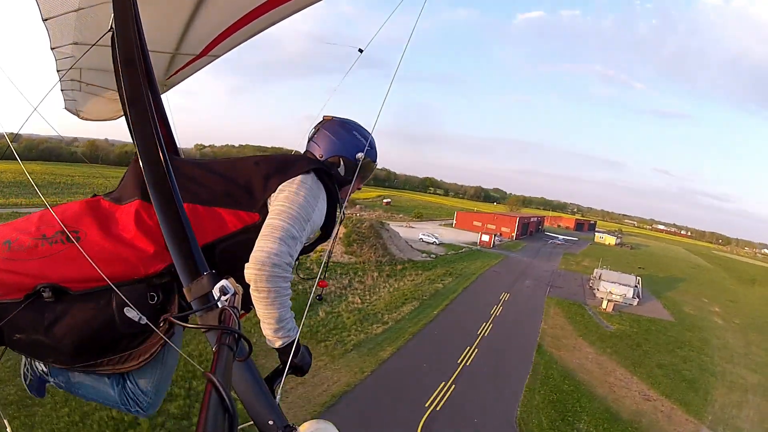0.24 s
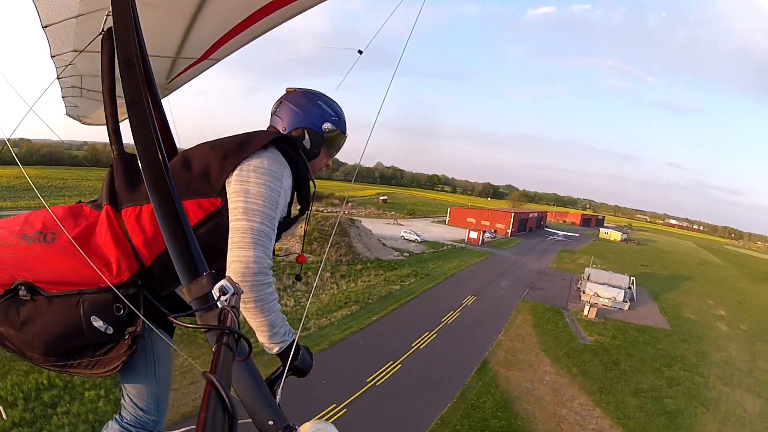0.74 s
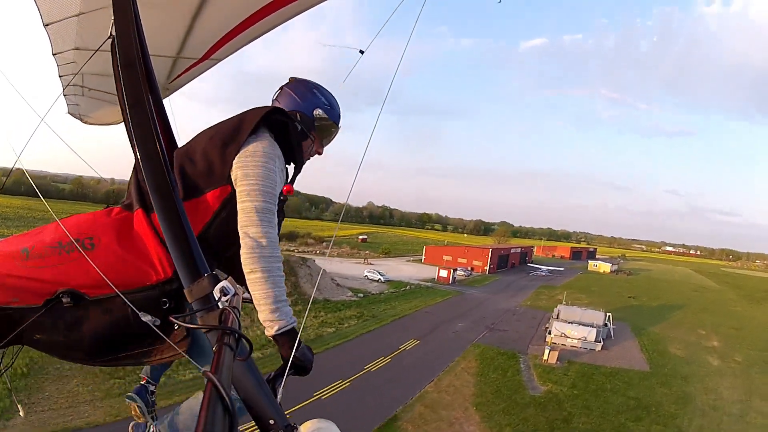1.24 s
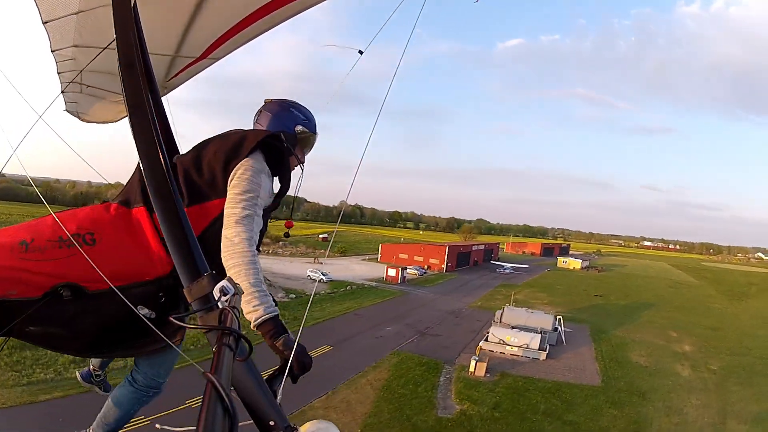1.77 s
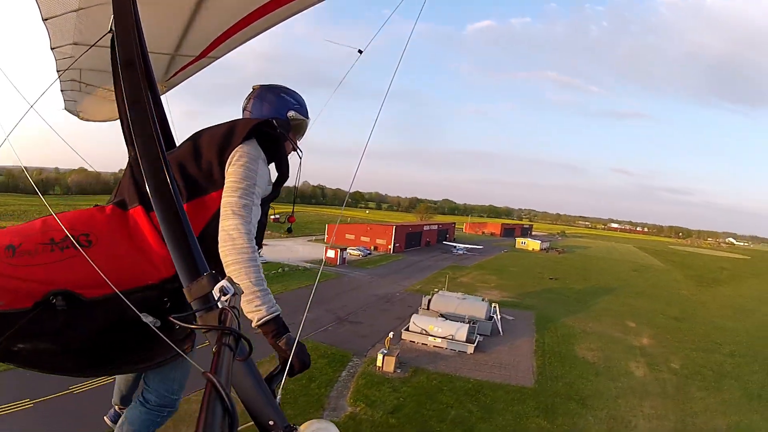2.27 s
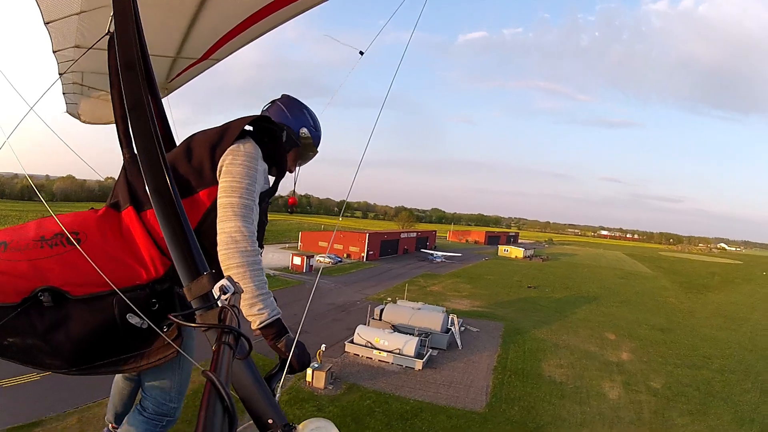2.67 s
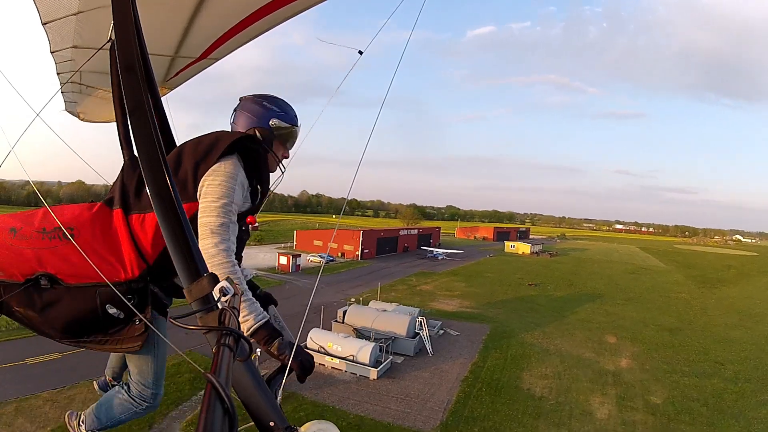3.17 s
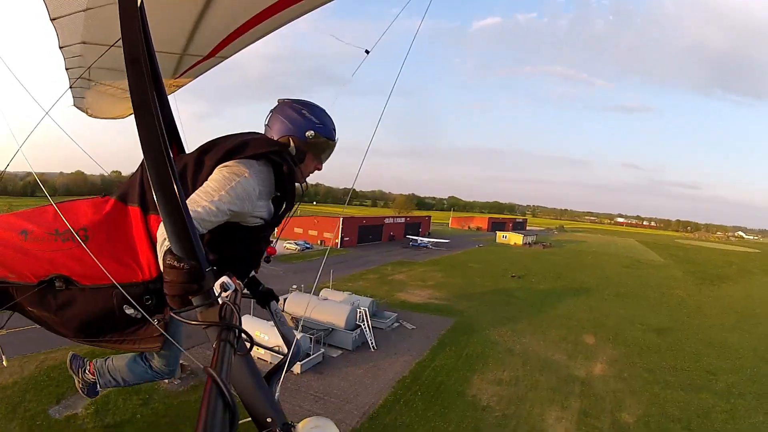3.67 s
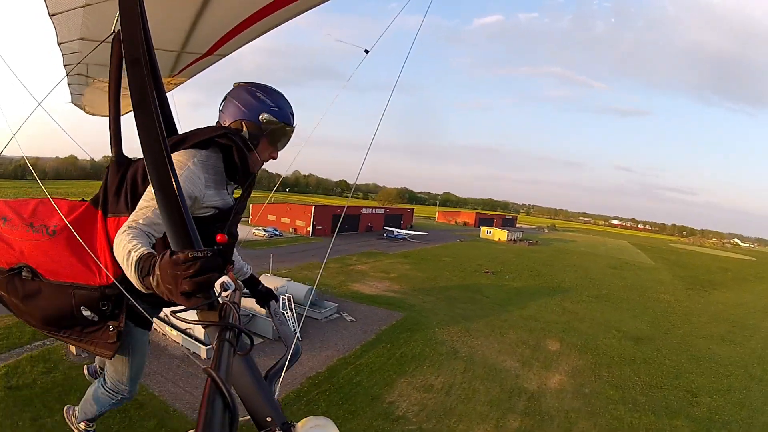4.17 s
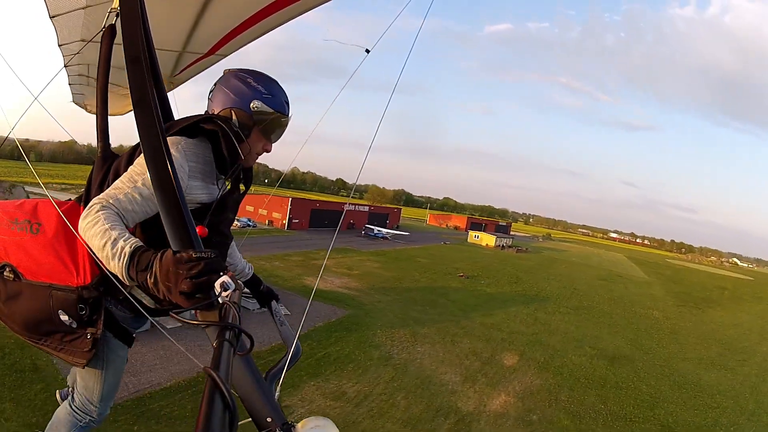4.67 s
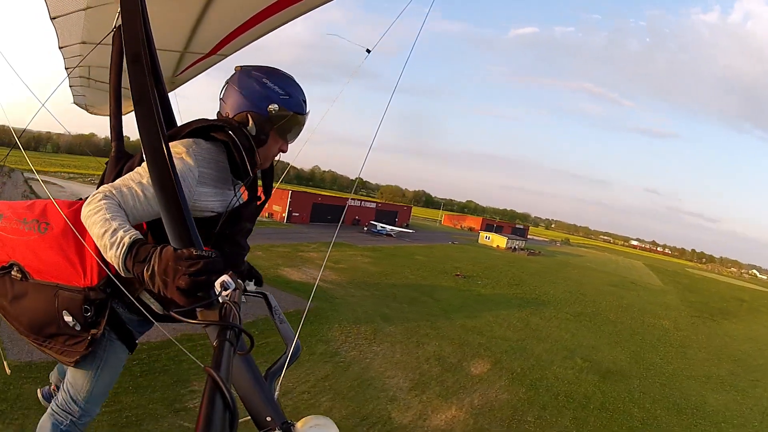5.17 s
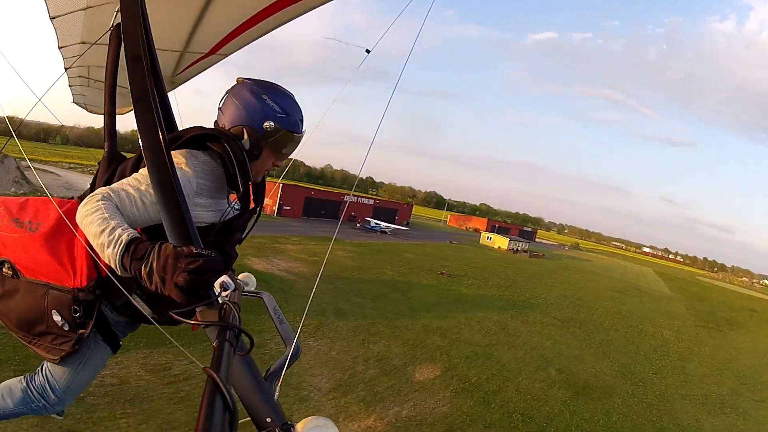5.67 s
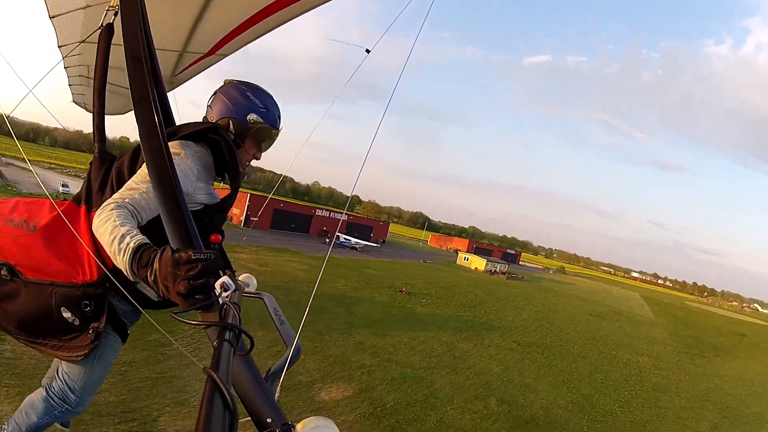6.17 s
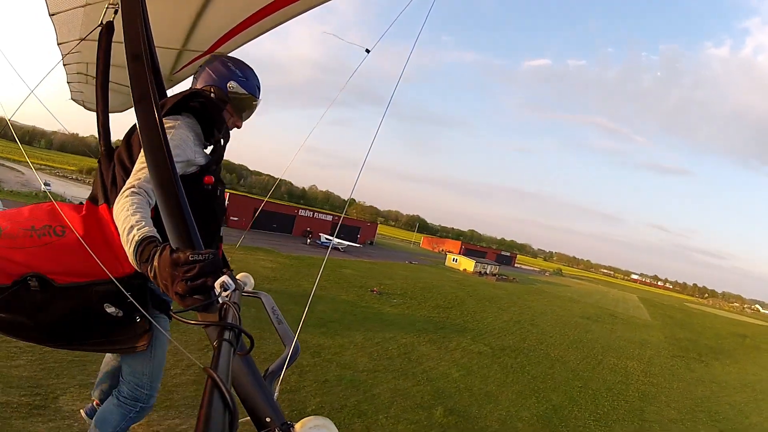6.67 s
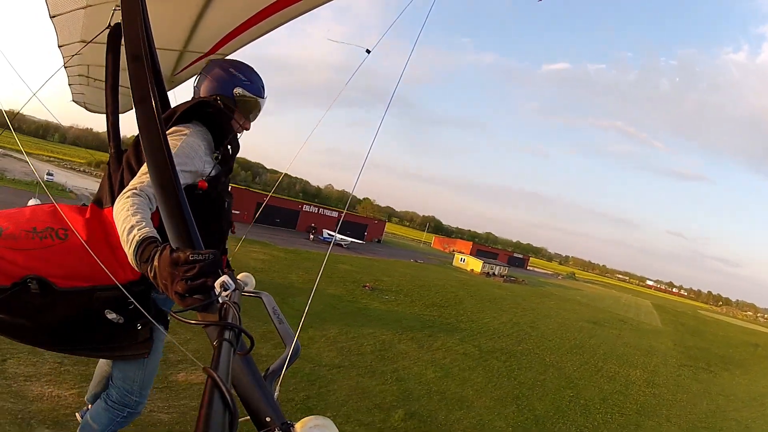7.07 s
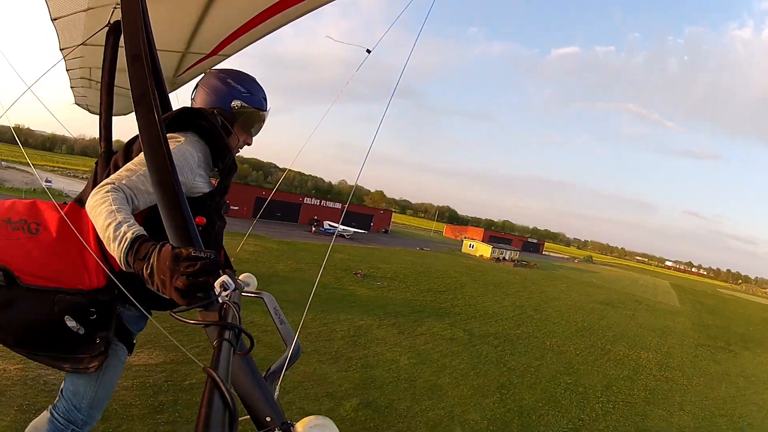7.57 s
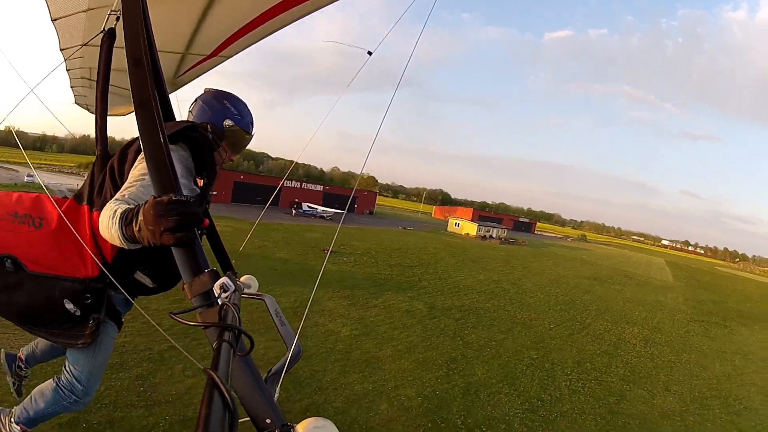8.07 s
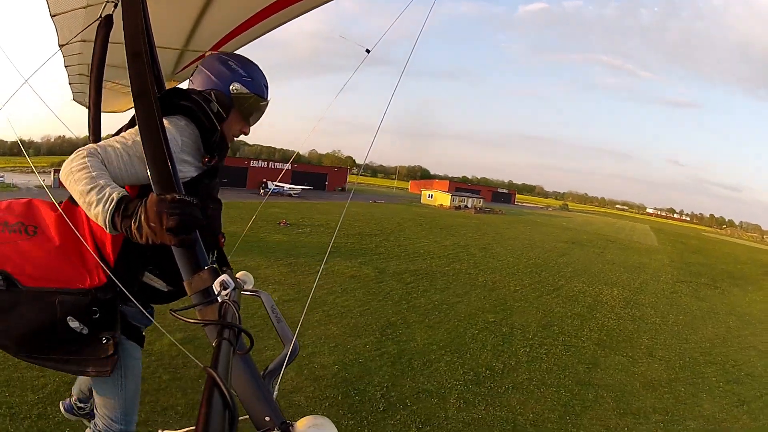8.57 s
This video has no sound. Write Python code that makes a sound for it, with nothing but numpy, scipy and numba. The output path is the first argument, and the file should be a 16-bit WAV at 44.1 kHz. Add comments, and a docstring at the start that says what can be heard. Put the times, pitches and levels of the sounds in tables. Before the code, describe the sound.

Wind blasts a small camera microphone mounted on a hang glider outdoors. It swells within the first 0.3 seconds into loud, fluttering low buffeting, with a mid rumble, bright hiss and a harsh, buzzy digital edge. Small ticks dot the first 1.4 seconds; a deep thump of air hits near 1.7. Firm frame knocks follow from 2.2, with a strong one at 2.7. Around 3.3 to 3.5 a dense clatter of hard, short, ringing clacks breaks out, and another sharp hit comes at 3.7; the wind dips momentarily after strong peaks. Clacks continue near 4.0, 4.8, 5.0, 6.05 and 6.5. The gusts rise and fall, while the hiss steadily thins and the rumble darkens. From 7.7 to 8.5 knocks and rattles gather again, strongest at 8.1 to 8.2, amid faint strap rustles. The wind ends much softer, around 8.8.

```python
"""Wind buffets a small camera's microphone port and hisses past its housing, as shaped noise with shared gusts.
It sinks as the hang glider that carries the camera slows towards a landing.
Rigging knocks travel through the frame and ring the housing, as cracks and decaying modes; straps rustle faintly.
The camera turns its gain down after peaks, clips, and holds each of its 12000 samples a second,
which mirrors the bass as a buzz."""
import sys
import numpy as np
from scipy import signal
from scipy.fft import rfft, irfft, next_fast_len
from scipy.io import wavfile
from scipy.ndimage import map_coordinates
from numba import njit

SR = 44100
rng = np.random.default_rng(int(sys.argv[2]) if len(sys.argv) > 2 else 0)


def bounce(signal):
    """Save signal as a 16-bit WAV file at the path given by the first command-line argument."""
    frames = np.transpose(np.atleast_2d(signal))
    limited = np.clip(frames, -1, 1)
    pcm = np.round(limited * 32767).astype(np.int16)
    wavfile.write(sys.argv[1], SR, pcm)


N = 388962


def amp(db):
    """Gain of a level in dB."""
    return 10 ** (np.asarray(db) / 20)


def unit(x):
    """x scaled to rms 1."""
    return x / np.sqrt(np.mean(x ** 2) + 1e-20)


def curves(rows):
    """One value per sample for each column after the time."""
    times, *columns = np.transpose(rows)
    t = np.arange(N) / SR
    return [np.interp(t, times, column) for column in columns]


def wobble(rate):
    """A smooth random curve with this many knots a second."""
    knots = rng.standard_normal(int(N * rate / SR) + 4)
    return map_coordinates(knots, [np.arange(N) * rate / SR])


def filtered(x, response):
    """x with its spectrum multiplied by a response of frequency."""
    size = next_fast_len(N + 8192)
    spectrum = rfft(x, size) * response(np.fft.rfftfreq(size, 1 / SR))
    return irfft(spectrum, size)[..., :N]


def rush(points, ring=lambda hz: 1):
    """Noise of rms 1, coloured by spectrum points on a log frequency axis and by a ringing response."""
    point_hz, point_db = np.transpose(points)

    def colour(hz):
        """Spectrum gain between the points, times the ringing."""
        return amp(np.interp(np.log(hz + 1), np.log(point_hz + 1), point_db)) * ring(hz)
    return unit(filtered(rng.standard_normal(N), colour))


# Colour of the large eddies on the port: (frequency [Hz], relative level per Hz [dB])
BUFFET_SPECTRUM = [(8.8, -50), (15, -19), (43, -3), (101, 0), (183, -3.5), (350, -12.5), (460, -42),
                   (770, -120)]


def large_eddies(buffet_db, gust):
    """Low buffeting: large eddies press on the port, swayed by the gusts and by a faster flutter."""
    level_db = buffet_db + 1.65 * gust + 1.34 * wobble(25)
    return amp(level_db) * rush(BUFFET_SPECTRUM)


THUMP_S, THUMP_DB, THUMP_HZ = 1.691, 6, 60.4  # centre, level before the envelope, pitch


def thump():
    """One big eddy slaps the port: about a single sine cycle under a bell-shaped envelope."""
    phase = 2 * np.pi * THUMP_HZ * (np.arange(N) / SR - THUMP_S)
    return amp(THUMP_DB) * np.sin(phase) * np.exp(-(phase / 2.7) ** 2)


# Colour of the small eddies in fast air: (frequency [Hz], relative level per Hz [dB])
EDDY_SPECTRUM = [(120, -32.5), (250, 0), (400, 0), (600, -6), (780, -10), (950, -19.5), (1400, -23.5),
                 (2500, -57)]
EDDY_DB, EDDY_LIKE_HISS = 6, 0.54  # level over a blend of buffet and hiss, share of the hiss in it
DARK_HZ, FAST_HISS_DB, SLOW_HISS_DB = 470, -32.5, -51  # the top above DARK_HZ goes as hiss sinks fast to slow


def small_eddies(buffet_db, hiss_db, gust):
    """Mid-range rumble of small eddies, which grows darker as the hiss sinks."""
    blend_db = buffet_db + EDDY_LIKE_HISS * (hiss_db - buffet_db)
    bright = rush(EDDY_SPECTRUM)
    dark = filtered(bright, lambda hz: 1 / (1 + (hz / DARK_HZ) ** 2))
    slow = np.clip((FAST_HISS_DB - hiss_db) / (FAST_HISS_DB - SLOW_HISS_DB), 0, 1)
    level_db = EDDY_DB + blend_db + 1.35 * gust + 1.05 * wobble(30)
    return amp(level_db) * ((1 - slow) * bright + slow * dark)


# Colour of the air past the housing: (frequency [Hz], relative level per Hz [dB])
HISS_SPECTRUM = [(500, -40), (900, -6), (1300, -6.5), (2000, -5.5), (3000, -4.5), (3900, -9), (4800, -15),
                 (5500, -21.5), (6000, -25), (6600, -86)]


def housing_hiss(hiss_db, gust):
    """Air hisses past the housing and sets its first four modes ringing."""
    def ring(hz):
        """Resonant peaks; a mode's width follows from its decay time."""
        peaks = [amp(db) / np.sqrt(1 + ((hz - mode_hz) * t60 / 0.55) ** 2)
                 for mode_hz, db, t60 in HOUSING_MODES[:4]]
        return 1 + 0.15 * sum(peaks)
    level_db = hiss_db + 0.49 * gust + 1.36 * wobble(40)
    return amp(level_db) * rush(HISS_SPECTRUM, ring)


# Airflow before gusts: (time [s], buffet level [dB], hiss level [dB])
AIRFLOW = [(0, -12, -33), (.3, -4.5, -29), (1.4, -7, -30), (2.1, -9.5, -31), (2.6, -9.5, -31),
           (3.1, -10, -33.5), (3.6, -14.5, -33.5), (4.1, -10, -34), (4.7, -8, -35.5), (5.15, -14, -40),
           (5.65, -8.5, -37), (6.1, -12, -38.5), (6.7, -14, -39.5), (7.35, -12.5, -42.5),
           (7.6, -10.5, -40.5), (7.85, -12, -41.5), (8.1, -15.5, -41.5), (8.5, -18, -43.5),
           (8.82, -18.5, -44)]


def wind():
    """Eddies of all sizes and the hiss share one airflow and its gusts."""
    buffet_db, hiss_db = curves(AIRFLOW)
    gust = wobble(9)
    buffeting = large_eddies(buffet_db, gust) + small_eddies(buffet_db, hiss_db, gust)
    return buffeting + housing_hiss(hiss_db, gust) + thump()


# Modes of housing and mount: (centre frequency [Hz], relative level [dB], decay time t60 [s])
HOUSING_MODES = [(1098, -10.5, 0.064), (1363, -1.5, 0.024), (1822, 0, 0.024), (3068, 4.5, 0.025),
                 (2327, 2, 0.012), (2623, 2.5, 0.0095), (3270, 4.5, 0.011), (3774, 1, 0.014),
                 (4466, -5.5, 0.015), (4855, -9.5, 0.01)]
# Part that each mode belongs to: (part [index]); 0 shell, 1 mount, 2 clamp, 3 latch, 4 panels, 5 small panels
MODE_PART = [0, 1, 2, 3, 4, 4, 4, 4, 5, 5]
# Where a knock lands, by name: (shell [dB], mount [dB], clamp [dB], latch [dB], panels [dB], small panels [dB],
# crack [dB], contact [ms])
PLACES_HIT = {"frame": (-12, -12, -23, -18.5, -9.5, -10.5, -6.5, 1.8),
              "housing": (-26, -16, -21, -14, -12, -12, -8, 1.56),
              "latch": (-30, -28, -13, -8.5, -9, -28, -30, 3),
              "clamp": (-17.5, -14.5, -8.5, -15, -15.5, -18.5, -16, 1.58),
              "mount": (-12, -7.5, -17, -21, -20, -26, -20, 1),
              "strap": (-8, -16, -22, -17, -14, 2.5, -6, 1.6)}
DETUNE_S = 0.00029  # over a mode's t60: relative pitch spread between blows, widest for quickly dying modes
CRACK_T60_S = 0.0064  # the broad snap of a contact
KNOCK_LENGTH = SR // 8  # samples


def knock(place, variation_db):
    """One blow: a crack, and modes that swell during the contact, then die away."""
    *parts_db, crack_db, contact_ms = PLACES_HIT[place]
    t = np.arange(KNOCK_LENGTH) / SR
    hz, mode_db, t60 = np.transpose(HOUSING_MODES)[:, :, None]
    level_db = mode_db + np.take(parts_db, MODE_PART)[:, None] + variation_db[:, None]
    pitch = hz * (1 + DETUNE_S / t60 * rng.standard_normal(hz.shape))
    modes = amp(level_db - 60 * t / t60) * np.sin(2 * np.pi * pitch * t)
    snap = np.diff(rng.standard_normal(len(t) + 1))  # noise tilted towards the treble
    crack = amp(crack_db - 60 * t / CRACK_T60_S) * snap
    swell = 1 - np.exp(-(t / (contact_ms / 1000)) ** 2)
    return swell * (crack + np.sum(modes, axis=0))


def add_knock(out, s, db, place, variation_db):
    """Mix one blow into out at s seconds."""
    start = round(s * SR)
    out[start:start + KNOCK_LENGTH] += amp(db) * knock(place, variation_db)


# Knocks of the rigging: (time [s], strength [dB], place [name])
RIGGING_KNOCKS = [(0.2287, -9, "latch"), (0.535, -8, "latch"), (0.908, -1, "latch"), (1.2295, -1, "latch"),
                  (1.3343, 1, "latch"), (1.337, -7, "clamp"), (1.396, -1, "frame"), (2.1884, 0.5, "frame"),
                  (2.4233, 3.5, "housing"), (2.6764, 12, "frame"), (2.738, -8, "housing"),
                  (2.8906, 7.5, "frame"), (3.261, 8.5, "frame"), (3.3265, -3, "frame"),
                  (3.3543, -2, "latch"), (3.3762, -5, "clamp"), (3.3827, 15.5, "housing"),
                  (3.397, 5, "housing"), (3.406, -1, "frame"), (3.42, -4, "latch"),
                  (3.4274, 11.5, "housing"), (3.438, 2, "latch"), (3.4553, 2, "clamp"),
                  (3.466, -5, "clamp"), (3.488, -4.5, "latch"), (3.512, -16, "latch"),
                  (3.706, 14.5, "frame"), (3.7912, -3.5, "clamp"), (3.882, -7.5, "clamp"),
                  (3.989, 5, "frame"), (4.7681, 8, "clamp"), (4.7815, -6, "clamp"), (4.7937, -4, "clamp"),
                  (4.9832, 5.5, "clamp"), (5.0543, -10, "mount"), (5.703, -9.5, "housing"),
                  (6.0511, 8, "frame"), (6.196, -7.5, "clamp"), (6.362, -12.5, "clamp"),
                  (6.474, 3, "frame"), (7.455, -28, "strap"), (7.686, -13, "latch"), (7.692, -14, "mount"),
                  (7.699, -11, "housing"), (7.873, 1.5, "housing"), (7.9018, -0.5, "clamp"),
                  (7.94, -18, "housing"), (7.96, -15, "latch"), (8.04, -25, "strap"), (8.0974, -6, "latch"),
                  (8.107, -4, "frame"), (8.132, 12.5, "housing"), (8.1882, 4, "mount"),
                  (8.198, -3, "latch"), (8.213, 12, "frame"), (8.2741, 0.5, "clamp"), (8.2826, -6, "clamp"),
                  (8.296, -15, "housing"), (8.383, -15, "clamp"), (8.414, -22, "strap"),
                  (8.462, -24, "strap"), (8.476, -25, "strap"), (8.489, -1, "housing"),
                  (8.7947, -12, "clamp")]
RATTLE_S, RATTLE_DB = .035, -20  # loose parts answer within this time, at least this much weaker


def rigging():
    """Knocks through the frame, each answered by three weaker blows of loose parts, later ones fainter."""
    out = np.zeros(N + SR)
    for s, db, place in RIGGING_KNOCKS:
        # the contact begins just ahead of the listed time
        add_knock(out, s - .0007, db, place, 2 * rng.standard_normal(len(HOUSING_MODES)))
        for late in rng.random(3):
            variation_db = rng.uniform(-7, 7, len(HOUSING_MODES))
            add_knock(out, s + RATTLE_S * late, db + RATTLE_DB - 8 * late, "frame", variation_db)
    return out[:N]


# Hands shift on the frame and straps rustle: (from [s], to [s], level of about the faintest tick [dB])
# A span of no length is a burst at one moment.
HANDLING_SPANS = [(0, 8.8, -41), (3.3, 3.3, -34), (7.65, 8.8, -38), (8.1, 8.8, -37)]
HANDLING_TICKS = (120, 14, 20, 30)  # ticks in each span


def handling():
    """Faint strap blows scattered through each span, few of them much louder than the rest."""
    out = np.zeros(N + SR)
    for (start, end, db), count in zip(HANDLING_SPANS, HANDLING_TICKS):
        for when, size in rng.random((count, 2)):
            tick_db = db - 3.4 * np.log(size + .06)
            variation_db = rng.uniform(-5, 5, len(HOUSING_MODES))
            add_knock(out, start + when * (end - start), tick_db, "strap", variation_db)
    return out[:N]


def scene():
    """Wind, rigging and handling at the one microphone."""
    return (wind() + rigging() + handling())[None]


@njit
def follow(level, top, attack, hold, release):
    """Gain that falls fast while the output is over top, waits, then climbs back to 1."""
    gain, g, wait = np.empty_like(level), 1., 0.
    for i in range(len(level)):
        if g * level[i] > top:
            g -= attack * (g - top / level[i])
            wait = hold
        elif wait > 0:
            wait -= 1
        else:
            g = min(1., g * release)
        gain[i] = g
    return gain


HELD_RATE = 12000  # samples a second in the camera
TOP_HZ, ROLL_HZ = 16424, 15350  # nothing passes from TOP_HZ up; a steep roll-off starts near ROLL_HZ


def record(dry):
    """The camera: sampling, gain control, clipping, sample-and-hold; then the extreme treble is rolled off."""
    x = signal.resample_poly(dry[0], 40, 147)  # SR to HELD_RATE
    attack_s, hold_s, release_db_per_s, treble = 0.0011, 0.049, 137, 1.8
    sensed = np.abs(x + treble * np.diff(x, prepend=0))  # the gain control hears treble louder
    attack = 1 / (1 + attack_s * HELD_RATE)
    release = float(amp(release_db_per_s / HELD_RATE))
    x = x * follow(sensed, 1.06, attack, hold_s * HELD_RATE, release)
    clipped = x / (1 + np.abs(x / 1.01) ** 8) ** (1 / 8)
    # holding each sample for four at 48 kHz leaves mirror images of the bass
    held = signal.resample_poly(np.repeat(clipped, 4), 147, 160)
    held = np.pad(held, (0, 8))[None, :N]
    return filtered(held, lambda hz: (hz < TOP_HZ) / np.sqrt(1 + (hz / ROLL_HZ) ** 150))


dry = scene()
out = record(dry)
bounce(out)
```